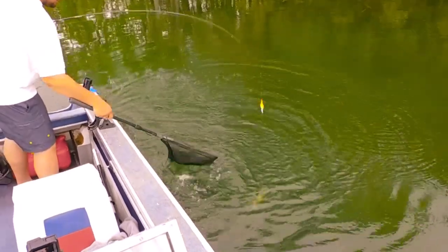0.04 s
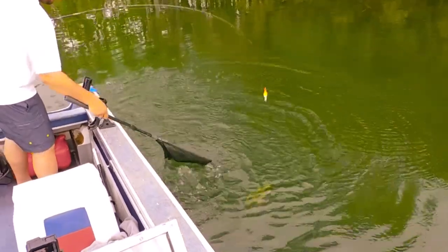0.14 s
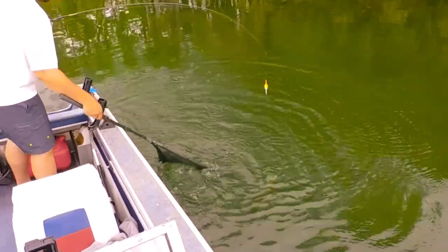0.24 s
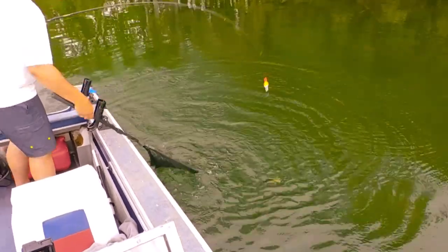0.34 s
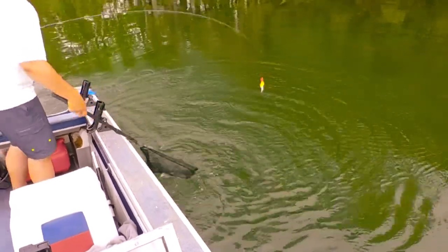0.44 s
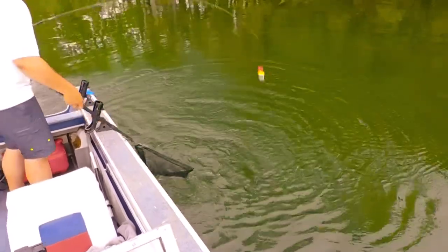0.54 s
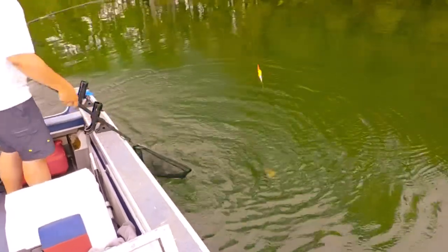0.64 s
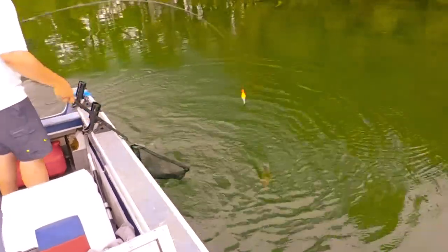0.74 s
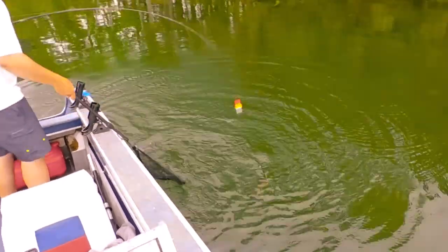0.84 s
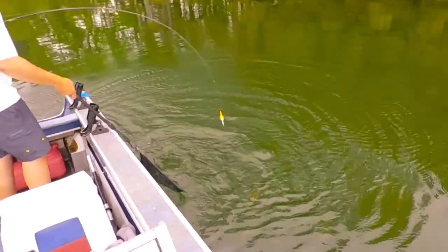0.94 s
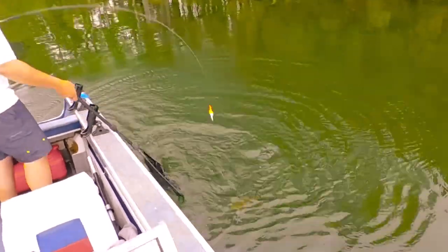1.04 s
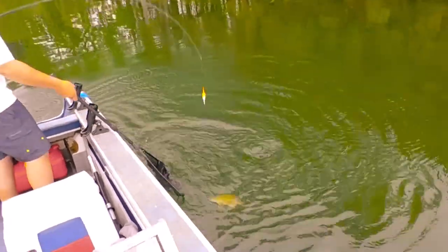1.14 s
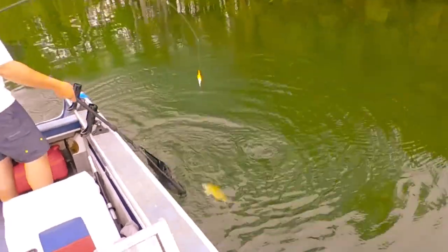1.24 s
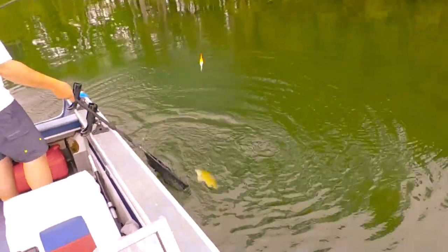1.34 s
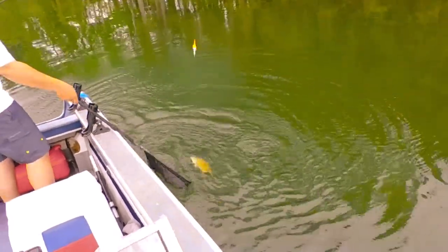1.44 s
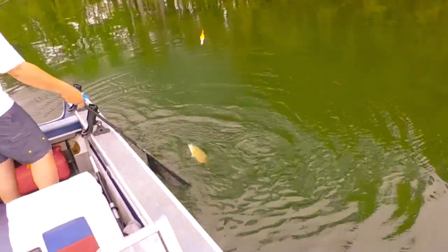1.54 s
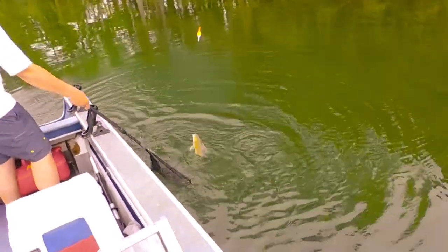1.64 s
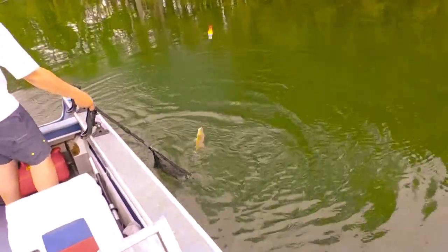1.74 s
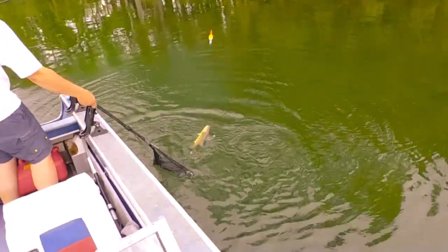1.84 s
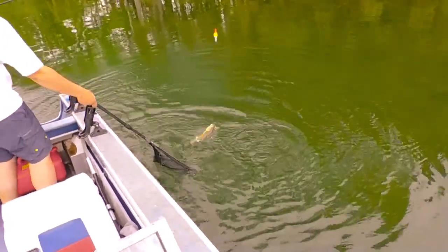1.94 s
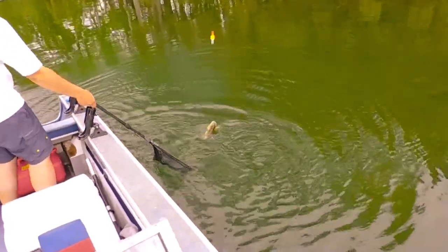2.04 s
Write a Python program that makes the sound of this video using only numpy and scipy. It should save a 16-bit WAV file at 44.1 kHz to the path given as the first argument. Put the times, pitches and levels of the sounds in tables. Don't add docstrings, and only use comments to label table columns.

```python
import sys
import numpy as np
from scipy import signal
from scipy.fft import rfft, irfft, next_fast_len
from scipy.io import wavfile
from scipy.ndimage import map_coordinates

SR = 44100
rng = np.random.default_rng(int(sys.argv[2]) if len(sys.argv) > 2 else 0)


def master(y):
    cut = np.clip(np.atleast_2d(y).T, -1, 1)
    pcm = np.round(cut * 32767)
    wavfile.write(sys.argv[1], SR, pcm.astype(np.int16))


def voltage_ratio(level):
    return 10 ** (np.asarray(level, float) / 20)


N = 92610
TOP_HZ = 15750

# frequency in Hz, likeness from 0 to 1.
LIKENESS = [(60, 0.65), (380, 0.54), (2380, 0.45), (15000, 0.011)]
# frequency in Hz, level in dB per Hz.
HISS_COLOUR = [(53, -22), (90, -0.5), (400, -6.5), (633, -2.5), (900, -6), (3400, -27.5), (6500, -28),
               (13000, -25), (16000, -26)]
# time in seconds, level in dB.
WIND_GUSTS = [(0, -66), (.22, -60), (.3, -63), (.35, -69), (.46, -57), (.55, -61), (.7, -62), (.93, -64),
              (.99, -57), (1.04, -70), (1.13, -63), (1.18, -70), (1.39, -73), (1.44, -64), (1.6, -66),
              (1.71, -76), (1.8, -65), (2.1, -66)]
# frequency in Hz, level in dB per Hz.
WIND_COLOUR = [(12, -20), (30, -8), (58, 0), (80, -10), (110, -35), (200, -120)]

# multiple of its turning rate, level in dB.
MOTOR_TONES = [(1, -76.5), (8, -84.5), (9, -75), (10, -76.5), (11, -69), (12, -77.5), (13, -79),
               (15, -77.5), (16, -81)]
MOTOR_HZ, MOTOR_FLUTTER_DB = 58.37, 1.5

# start in seconds, length in seconds, start pitch in Hz, end pitch in Hz, level in dB.
WHISTLES = [(.92, .04, 4100, 4300, -80), (1.15, .035, 3900, 4700, -78), (1.215, .07, 6300, 4600, -80),
            (1.275, .04, 4750, 4650, -80), (1.31, .045, 4500, 3650, -76), (1.345, .03, 3650, 3600, -77),
            (1.35, .07, 4100, 5100, -79), (1.37, .08, 2900, 3800, -78), (1.41, .05, 4700, 4800, -80),
            (1.44, .03, 3000, 2950, -79), (1.47, .05, 4600, 3600, -78), (1.495, .05, 4300, 5000, -78),
            (1.52, .06, 4300, 4900, -80), (1.615, .035, 6100, 5000, -80), (1.64, .06, 4800, 3600, -78),
            (1.665, .05, 4100, 3900, -80), (1.69, .05, 3700, 2900, -78), (1.7, .06, 4600, 3600, -81)]
TWITTER_HZ, TWITTER_DB = 4600, -84
BIRD_ROUGHNESS, BIRD_ECHO_DB, BIRD_ECHO_T60 = 1.1, 1, 0.12
AIR_LOSS_DB = -3

# time in seconds, level in dB.
GURGLE_LEVEL = [(1.25, -94), (1.4, -71), (1.75, -71), (1.9, -78)]
# frequency in Hz, level in dB per Hz.
GURGLE_COLOUR = [(140, -33), (220, -3.5), (400, -3.5), (600, -28), (900, -120)]
# time in seconds, level in dB.
LAPPING_LEVEL = [(0, -63.5), (.2, -60), (.5, -62), (.9, -63), (1.2, -65.5), (1.4, -62.5), (1.7, -61),
                 (2.1, -66)]
# frequency in Hz, level in dB per Hz.
SLOSH_COLOUR = [(88, -74), (150, -20.5), (448, -7.5), (648, -4), (825, -10.5), (1050, -8.5), (2200, -15),
                (7000, -32.5), (9100, -59), (15400, -120)]
SLOSH_DB, SLOSH_SWING_DB = -3.5, 1.5
GRAIN_DB, GRAIN_SIZE_DB = -6, 3
GRAIN_HZ, GRAIN_SPREAD, GRAIN_CYCLES = 1110, 0.451, 9

# start in seconds, peak in dB, pitch in Hz, length in cycles.
TICKS = [(0.207, -52, 3300, 25), (.2133, -41, 2500, 3), (0.215, -41.5, 4770, 25), (0.2154, -43, 1880, 5),
         (0.217, -34, 2100, 7.7), (.2173, -44, 4500, 3.5), (.2176, -52, 7800, 8), (0.23, -38, 2150, 5.4),
         (.232, -55, 8300, 10), (.2325, -61, 6500, 8), (.2375, -39, 8200, 4), (0.2507, -52, 2500, 5),
         (0.3735, -35, 2950, 6.8), (.381, -35, 2490, 8.8), (.388, -46, 2650, 6), (0.397, -42, 2410, 8),
         (.435, -54, 3300, 8), (.471, -57, 1380, 8), (.486, -52, 1430, 8), (.218, -36, 1200, 12),
         (0.23, -38.5, 3120, 45), (0.2323, -34.5, 1160, 6.2), (0.2388, -40, 2190, 8.1),
         (0.242, -41, 2780, 8.6), (.278, -49.5, 3820, 3.6), (0.4128, -41, 4300, 3),
         (0.4147, -31, 2800, 3.4), (.7112, -50, 8500, 3), (.7215, -46, 2600, 3), (.724, -52, 4500, 4),
         (.834, -51, 3200, 3), (.2176, -51, 11600, 14), (.2315, -51, 10200, 20), (.2435, -50, 11000, 5),
         (.86, -50, 1800, 4), (0.426, -40.5, 2770, 4.3), (0.7108, -34, 2440, 1.5), (0.7183, -50, 2900, 6),
         (1.151, -46, 2470, 4.9), (1.483, -48.5, 2120, 4.2), (1.741, -51.5, 2750, 37),
         (1.742, -49, 1890, 27), (1.766, -49.5, 2020, 13), (1.768, -54.5, 2840, 50), (1.789, -53, 2270, 28),
         (1.922, -51.5, 2820, 39)]
# start in seconds, length in seconds, level in dB, top frequency in Hz.
SPRAYS = [(.212, 0.038, -58, 4360), (0.22, 0.018, -61.5, 12500), (0.357, .01, -56, 4040),
          (0.368, 0.026, -58.5, 6600), (.412, 0.034, -63, 4000), (0.439, 0.081, -68.5, 2500),
          (.7, 0.042, -64.5, 5230), (0.707, 0.035, -81, 11000), (1.661, 0.11, -70, 2000),
          (1.72, 0.07, -70, 3400), (1.819, .12, -74, 2930)]
SPRAY_LUMPS_DB = 3
# start in seconds, pitch in Hz, peak in dB.
BUBBLES = [(0.097, 1820, -50), (.219, 688, -41), (.234, 917, -48.5), (0.299, 1034, -50), (0.586, 1980, -45),
           (.614, 2020, -61), (.636, 2040, -59), (0.859, 1950, -56.5), (0.9951, 1060, -47.5),
           (1.456, 1010, -51), (1.667, 1034, -51.5), (1.786, 1020, -55), (1.797, 1100, -52.5),
           (1.803, 950, -51.5), (1.833, 1730, -56), (1.91, 1540, -53), (1.951, 1700, -59),
           (2.009, 1160, -63), (2.042, 1500, -56.5), (2.048, 1045, -53.5), (.04, 1960, -56.5),
           (.126, 2200, -54), (1.876, 1550, -53.5), (1.882, 1030, -42.5), (1.889, 1160, -48.5),
           (1.907, 2320, -48.5), (1.919, 2200, -43.5), (1.97, 2220, -56)]
BUBBLE_RISE, BUBBLE_CYCLES = 0.47, 35
# start in seconds, start pitch in Hz, peak in dB,
# time to fall 60 dB in seconds, climb in octaves per second.
RISERS = [(0.174, 1520, -50, 0.059, 8.5), (0.271, 815, -54.5, 0.11, 24.5), (0.968, 1300, -53.5, 0.057, 27),
          (.997, 876, -51.5, 0.16, 5.5), (1.19, 1755, -55, 0.056, -4.5), (1.695, 1595, -46, 0.037, 14.5)]
# time in seconds, pitch in Hz, level in dB.
GULP = [(.75, 700, -62), (.78, 950, -58), (.793, 1250, -56), (.803, 1750, -58), (.808, 1950, -70)]
NEAR_PAN_DB, NEAR_ECHO_DB, NEAR_ECHO_T60 = -0.5, -15, 0.06

# start in seconds, peak in dB, brightness in dB per octave.
KNOCKS = [(0.3642, -27.5, -1.5), (0.387, -32, 4.5), (0.586, -34, 1.5), (0.606, -51, 11),
          (0.636, -40.5, 5.5), (0.659, -49.5, 1), (0.693, -48.5, -6), (0.863, -41, -0.5), (0.886, -53, -4),
          (0.94, -53.5, 7), (0.974, -49.5, 2.5)]
# pitch in Hz, level in dB, time to fall 60 dB in seconds.
HULL_TONES = [(133.3, 1.5, 0.22), (176.7, 2, 0.12), (210, 1, 0.15), (281.5, -2, 0.098), (431, -2, 0.1),
              (549.3, -8, 0.11), (838, 1.5, 0.018)]
HULL_DB, HULL_DETUNE, BRIGHT_HZ = -9.5, 0.012, 300
RUMBLE_DB, RUMBLE_T60 = -18.5, 0.37
# start in seconds, peak in dB.
CLANKS = [(0.3651, -27)]
# pitch in Hz, level in dB, time to fall 60 dB in seconds.
HANDLE_TONES = [(785, 5, 0.029), (1268, -7, 0.051), (1800, -40, .04), (2430, -13, 0.099), (3230, 3, 0.0073),
                (6190, 0.5, 0.009), (5950, -9, 0.029), (8520, -7.5, 0.0063)]
CLANK_DB, CRACK_DB, SCRAPE_DB, SCRAPE_T60 = -6, -7, -13.5, 0.11
# start in seconds, pitch in Hz, peak in dB, time to fall 60 dB in seconds.
BOOM = (.3705, 64.5, -36.5, .2)


def unit(x):
    return x / np.sqrt(np.mean(x ** 2) + 1e-20)


def along(points, hz):
    f, v = np.transpose(points)
    return np.interp(np.log(hz + 1), np.log(f + 1), v)


def curve(rows):
    return np.interp(np.arange(N) / SR, *np.transpose(rows))


def wobble(rate):
    points = rng.standard_normal(int(N * 400 / SR) + 4)
    return map_coordinates(points, [np.arange(N) * min(rate, 400) / SR])


def rush(spectrum, alike):
    m = next_fast_len(N + 8192)
    hz = np.fft.rfftfreq(m, 1 / SR)
    turn = np.arccos(np.clip(along(alike, hz), -1, 1)) / 2
    colour = voltage_ratio(along(spectrum, hz)) * (hz < TOP_HZ)
    noise = rfft(rng.standard_normal((2, m)))
    mid, side = irfft(noise * colour * [np.cos(turn), np.sin(turn)], m)[:, :N]
    return unit(np.array([mid + side, mid - side]))


def add(track, s, sound):
    start = round(s * SR)
    track[start:][:len(sound)] += sound[:N - start]


def ring(hz, db, t60, t, rise=0., attack=0.00041):
    phase = 2 * np.pi * np.cumsum(hz * 2 ** np.minimum(rise * t, 1.5)) / SR
    return voltage_ratio(db - 60 * t / t60) * (1 - np.exp(-t / attack)) * np.sin(phase)


def tail(t60, t, lo_hz, hi_hz):
    sos = signal.butter(3, [lo_hz, hi_hz], "bandpass", fs=SR, output="sos")
    return unit(signal.sosfilt(sos, rng.standard_normal(len(t)))) * voltage_ratio(-60 * t / t60)


def echoes(x, t60):
    t = np.arange(SR // 5) / SR
    echo = rng.standard_normal((2, len(t))) * voltage_ratio(-60 * t / t60)
    late = np.pad(x, (60, 0))[None]
    return signal.fftconvolve(late, echo / np.linalg.norm(echo[0]), axes=1)[:, :N]


def hiss():
    return voltage_ratio(-65.5) * rush(HISS_COLOUR, LIKENESS)


def wind():
    return voltage_ratio(curve(WIND_GUSTS) + 2.0 * wobble(14)) * rush(WIND_COLOUR, [(30, 0.89)])


def motor():
    turn = 2 * np.pi * np.cumsum(MOTOR_HZ * (1 + 0.0034 * wobble(3.056))) / SR
    hum = np.zeros(N)
    for k, db in MOTOR_TONES:
        level = voltage_ratio(db + 1.5 + MOTOR_FLUTTER_DB * wobble(6.75))
        hum += level * np.sin(k * turn + 0.064 * wobble(1.0))
    return hum


def birds(count=28):
    out, luck = np.zeros(N), rng.standard_normal((count, 3))
    starts = np.linspace(0.27, 1.12, count) + 0.0097 * luck[:, 0]
    twitter = []
    for s, (_, pitch, way) in zip(starts, luck):
        from_hz = TWITTER_HZ * (1 + 0.08 * pitch)
        to_hz = TWITTER_HZ * (1 + 0.08 * pitch + 0.16 * np.sign(way))
        twitter.append((s, 0.035, from_hz, to_hz, TWITTER_DB))
    for s, length, from_hz, to_hz, db in list(WHISTLES) + twitter:
        u = np.arange(round(length * SR)) / (length * SR)
        level = voltage_ratio(db + AIR_LOSS_DB * np.log2(from_hz / TWITTER_HZ))
        phase = 2 * np.pi * np.cumsum(from_hz * (to_hz / from_hz) ** u) / SR
        add(out, s, level * np.sqrt(np.sin(np.pi * u)) * np.sin(phase))
    out = out * (1 + BIRD_ROUGHNESS * wobble(300))
    return out + voltage_ratio(BIRD_ECHO_DB) * echoes(out, BIRD_ECHO_T60)


def gurgle():
    return voltage_ratio(curve(GURGLE_LEVEL) + 4.6 * wobble(24.71)) * rush(GURGLE_COLOUR, [(300, 0.98)])


def lapping(count=400):
    luck, t, grains = rng.random((count, 4)), np.arange(SR // 25) / SR, np.zeros((2, N))
    for when, pitch, size, side in luck:
        s = when * (N - 1) / SR
        hz = np.clip(GRAIN_HZ * (pitch / (1 - pitch)) ** (GRAIN_SPREAD / 2), 330, 4000)
        db = -GRAIN_SIZE_DB * np.log(0.17 + size)
        grain = ring(hz, db, 2 * GRAIN_CYCLES / hz, t, rise=8.5, attack=0.0018)
        add(grains[0], s, grain * voltage_ratio(8.2 * (side - 0.7)))
        add(grains[1], s, grain * voltage_ratio(-4 * (side - 0.96)))
    swing = SLOSH_SWING_DB * (wobble(8.37) + wobble(40.0))
    slosh = voltage_ratio(SLOSH_DB + swing) * rush(SLOSH_COLOUR, LIKENESS)
    return voltage_ratio(curve(LAPPING_LEVEL)) * (slosh + voltage_ratio(GRAIN_DB) * unit(grains))


def ticks(out, t):
    for s, db, hz, cycles in TICKS:
        tick = ring(hz, 0, max(cycles, 1) / hz, t, attack=0.5 / hz) * np.minimum(t * hz, 1)
        add(out, s, voltage_ratio(db - 2) * tick / abs(tick).max())


def sprays(out, t):
    for s, length, db, top_hz in SPRAYS:
        swell = np.sqrt(np.sin(np.pi * np.clip(t / length, 0, 1)) + 1e-9)
        lumps = voltage_ratio(db + SPRAY_LUMPS_DB * wobble(400)[:len(t)])
        add(out, s, lumps * swell * tail(1.3, t, 800, top_hz))


def bubbles(out, t):
    short = [(s, hz, db, BUBBLE_CYCLES / hz, BUBBLE_RISE) for s, hz, db in BUBBLES]
    for s, hz, db, t60, rise in short + list(RISERS):
        add(out, s, ring(hz, db, t60, t, rise, attack=0.00022))


def gulp(out):
    s, hz, db = np.transpose(GULP)
    t = np.arange(s[0], s[-1], 1 / SR)
    phase = 2 * np.pi * np.cumsum(np.interp(t, s, hz)) / SR
    add(out, s[0], voltage_ratio(np.interp(t, s, db)) * np.sin(phase))


def near_water():
    near, t = np.zeros(N), np.arange(SR // 6) / SR
    ticks(near, t)
    sprays(near, t)
    bubbles(near, t)
    gulp(near)
    sides = np.array([np.roll(near, 2), near]) * voltage_ratio([[NEAR_PAN_DB], [-NEAR_PAN_DB]])
    return sides + voltage_ratio(NEAR_ECHO_DB) * echoes(near, NEAR_ECHO_T60)


def knock(bright_db, t):
    panels = np.zeros(len(t))
    for k, (hz, db, t60) in enumerate(HULL_TONES):
        pitch_luck, level_luck = rng.standard_normal(2)
        level = db + 2 * level_luck + bright_db * np.log2(hz / BRIGHT_HZ)
        panels += (-1) ** k * ring(hz * (1 + HULL_DETUNE * pitch_luck), level, t60, t, attack=0.003)
    return voltage_ratio(HULL_DB) * panels + voltage_ratio(RUMBLE_DB) * tail(RUMBLE_T60, t, 80, 332)


def clank(t):
    metal = sum(ring(*tone, t) for tone in HANDLE_TONES)
    metal = metal + voltage_ratio(CRACK_DB) * tail(0.005, t, 5800, 14000)
    scrape = voltage_ratio(SCRAPE_DB + 0.93 * wobble(300)[:len(t)]) * tail(SCRAPE_T60, t, 480, 2160)
    return voltage_ratio(CLANK_DB) * metal + scrape


def hull():
    out, t = np.zeros(N), np.arange(SR // 2) / SR
    for s, db, bright_db in KNOCKS:
        add(out, s, voltage_ratio(db) * knock(bright_db, t))
    for s, db in CLANKS:
        add(out, s, voltage_ratio(db) * clank(t))
    add(out, BOOM[0], ring(*BOOM[1:], t, attack=0.0045))
    return out


def scene():
    background = hiss() + wind() + motor() + birds()
    water = gurgle() + lapping() + near_water()
    return background + water + hull()


def top_cut(x):
    return signal.sosfilt(signal.butter(12, 16430, fs=SR, output="sos"), x)


def record(dry):
    m = next_fast_len(N + 8192)
    audible = np.fft.rfftfreq(m, 1 / SR) < TOP_HZ
    mix = irfft(rfft(dry, m) * audible, m)[:, :N]
    return top_cut(mix)


dry = scene()
out = record(dry)
master(out)
```